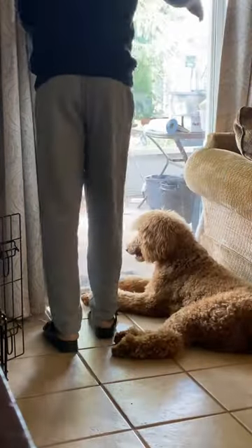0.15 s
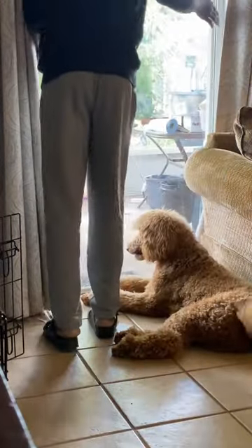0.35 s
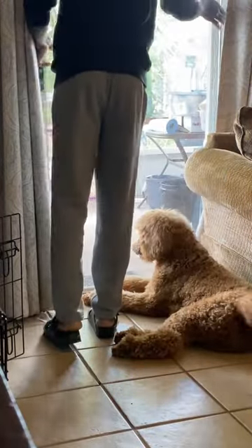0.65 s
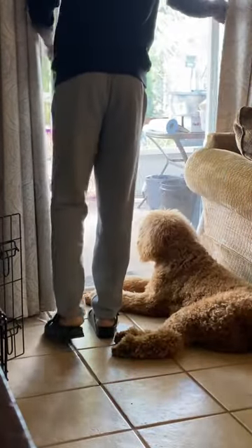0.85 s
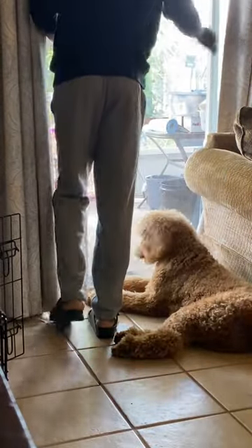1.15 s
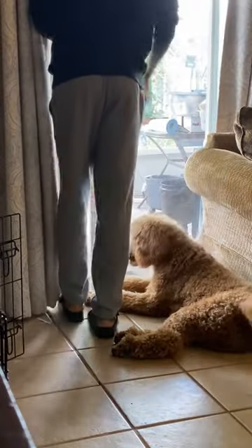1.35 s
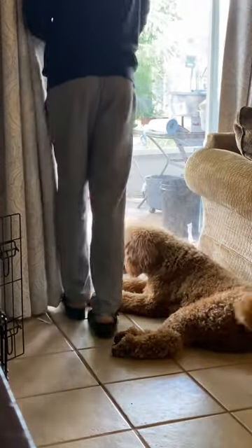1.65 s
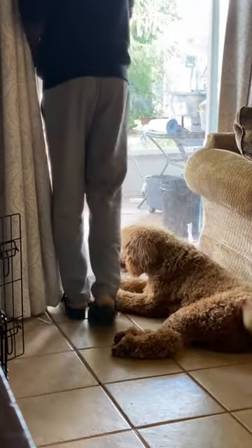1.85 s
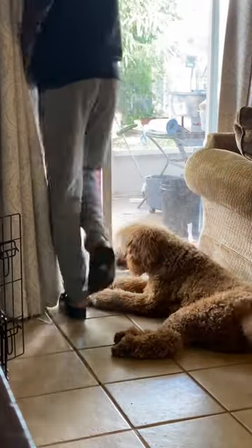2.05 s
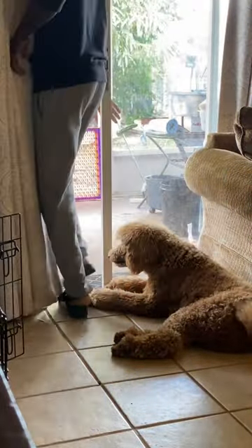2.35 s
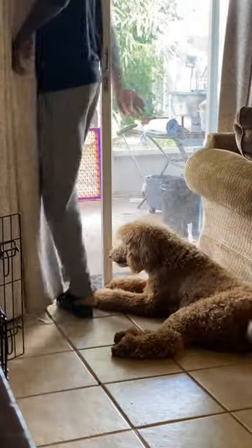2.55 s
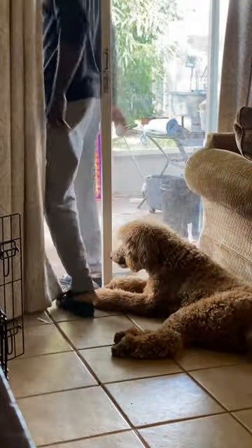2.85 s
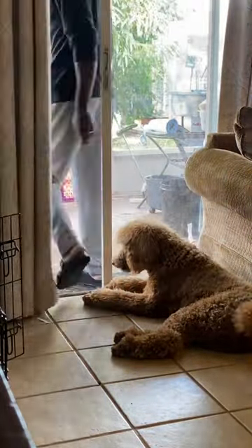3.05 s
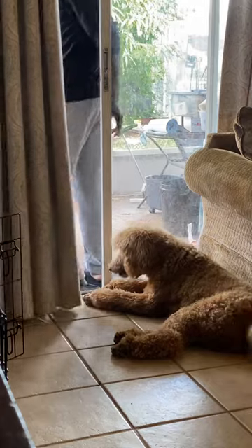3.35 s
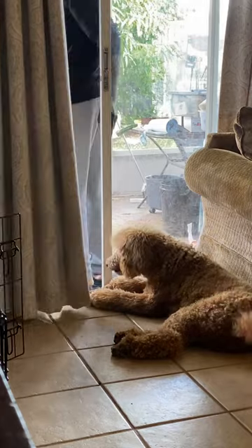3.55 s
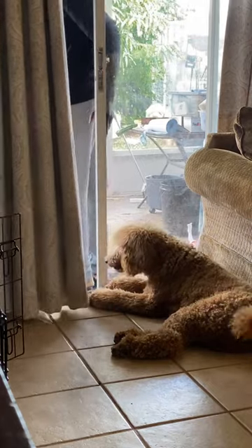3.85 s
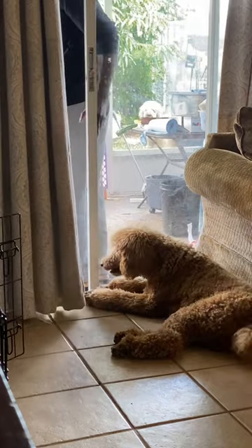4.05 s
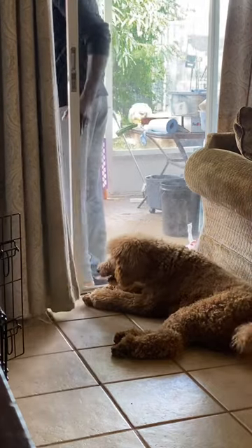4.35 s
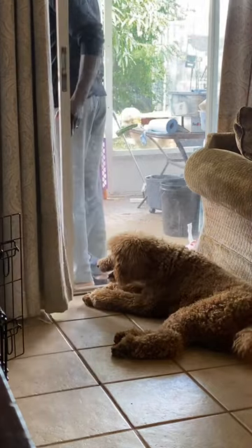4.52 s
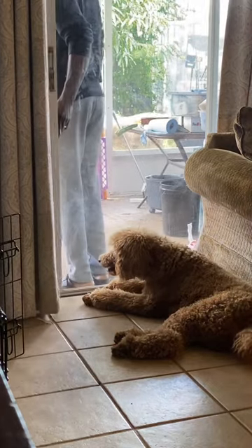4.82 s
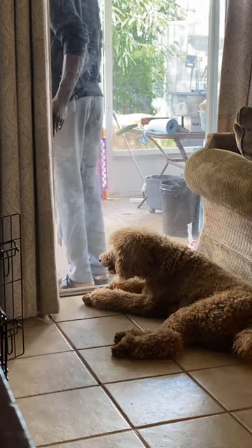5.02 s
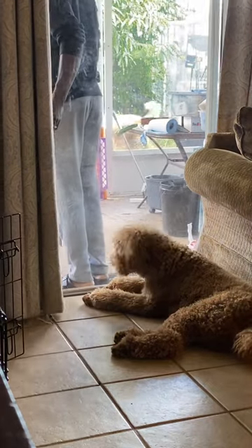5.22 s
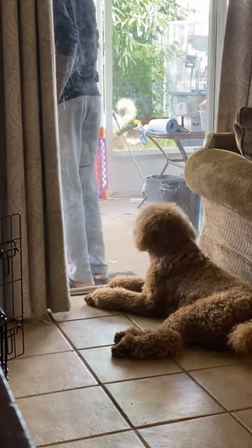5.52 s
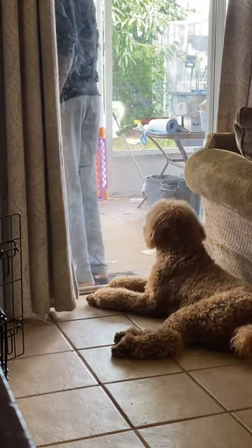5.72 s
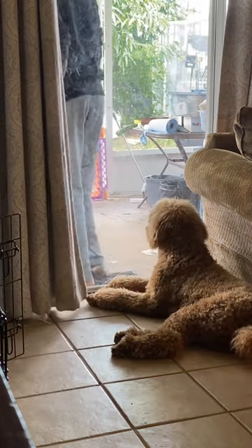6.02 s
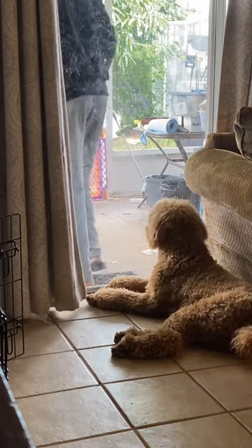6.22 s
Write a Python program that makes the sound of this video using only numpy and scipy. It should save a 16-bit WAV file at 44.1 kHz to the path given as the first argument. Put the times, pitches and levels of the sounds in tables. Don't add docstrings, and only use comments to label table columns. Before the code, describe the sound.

A low, unsteady machine hum near 90 hertz and soft room air run underneath, heard close to a tiled floor with short, hard reflections. At 0 seconds a shoe taps and scuffs; curtain cloth swishes faintly. From 0.45 the glass door starts with small gritty ticks, then breaks free at 0.82 with a hard hollow knock, rebounding at 0.9 and 1.0 as pane and frame shudder and the rail scrapes, slowing until 1.55. Heavy shoe thuds, scuffs and thin squeaks cross the sill from 1.7 to 2.5. Cloth brushes, with another step at 3.2 and a lighter one at 3.5. From 3.6 the door rolls shut, duller, with repeated clacks and taps; the latch strikes sharply at 4.46. Small rattles and clacks settle until 5.4. Deep, soft footfalls come at 5.5 to 5.9, the hum surging briefly, then dropping away to near quiet by 6.3.

```python
import sys
import numpy as np
from scipy import signal
from scipy.fft import rfft, irfft, next_fast_len
from scipy.io import wavfile

SR = 44100
rng = np.random.default_rng(int(sys.argv[2]) if len(sys.argv) > 2 else 0)


def voltage_ratio(decibels):
    exponent = np.asarray(decibels, float) / 20
    return 10 ** exponent


def store_wav(level_fs):
    pcm = np.round(np.clip(np.atleast_2d(level_fs), -1, 1) * 32767)
    wavfile.write(sys.argv[1], SR, pcm.T.astype(np.int16))


N = 281269


def rms_one(x):
    return x / np.sqrt(np.mean(x ** 2) + 1e-20)


def in_time(rows):
    s, *columns = np.transpose(rows)
    return [np.interp(np.arange(N) / SR, s, c) for c in columns]


def at_hz(points, hz):
    f, db = np.transpose(points)
    return np.interp(np.log(hz + 1), np.log(f), db)


def drift(rate):
    r = np.exp(-80 * np.pi * rate / SR)
    noise = rng.standard_normal(N // 40 + 2002)
    slow = signal.lfilter([1], [1, -2 * r, r * r], noise)[2000:]
    return np.interp(np.arange(N) / 40, np.arange(len(slow)), rms_one(slow))


def colour(x, spectrum):
    hz = np.fft.rfftfreq(N, 1 / SR)
    low, high = spectrum[0][0], spectrum[-1][0]
    skirt = 1 / np.sqrt((1 + (low / (hz + 1)) ** 8) * (1 + (hz / high) ** 8))
    return rms_one(irfft(rfft(x) * voltage_ratio(at_hz(spectrum, hz)) * skirt, N))


def resonate(x, modes):
    out = 0
    for k, (hz, width, db) in enumerate(modes):
        r = np.exp(-np.pi * max(width, 2) / SR)
        a = [1, -2 * r * np.cos(2 * np.pi * hz / SR), r * r]
        b = np.array([1, 0, -1]) * (1 - r * r) / 2
        out = out + (-1) ** k * voltage_ratio(db) * signal.lfilter(b, a, x)
    return out


def patchy(x, modes):
    return sum(voltage_ratio(3.5 * drift(9)) * resonate(x, [mode]) for mode in modes)


def dull(x, hz):
    return signal.sosfilt(signal.butter(4, hz, fs=SR, output="sos"), x)


def grit(per_s, spread_db):
    sizes = voltage_ratio(spread_db * np.minimum(rng.exponential(1, N), 4)) * rng.choice([-1, 1], N)
    return rms_one(sizes * (rng.random(N) < per_s / SR))


def bursts(times, levels_db, t60s, rises, bend=1):
    out = np.zeros(N)
    t = np.arange(SR // 2) / SR
    for s, db, t60, rise, curve in zip(times, levels_db, t60s, rises, bend + 0 * times):
        i = round(s * SR)
        attack = 1 - np.exp(-t / max(rise, 1e-4))
        shape = attack * voltage_ratio(db - 60 * (t / max(t60, .01)) ** curve)
        out[i:i + len(t)] += shape[:N - i]
    return out


def blows(times, levels_db, modes):
    strike = np.zeros(N) + 1e-18
    strike[np.round(times * SR).astype(int)] = voltage_ratio(levels_db)
    unit = resonate(signal.unit_impulse(2000), modes)
    return resonate(strike, modes) / np.max(np.abs(unit))


def swells(rows):
    t = np.arange(N) / SR
    return sum(voltage_ratio(db) * np.sin(np.pi * np.clip((t - s) / length, 0, 1)) ** .5 for s, length, db in rows)


def joined(*levels_db):
    return 10 * np.log10(sum(voltage_ratio(2 * db) for db in levels_db))


# (t/s, level/dB)
OPENING = [(0.451, -90.5), (.64, -74), (.73, -67.5), (0.831, -67), (.92, -59.5), (1.1, -68), (1.299, -75.5),
           (1.468, -71.5), (1.571, -90)]
# (t/s, level/dB)
CLOSING = [(3.62, -100), (3.819, -80), (4.05, -75.5), (4.16, -70), (4.3, -73.5), (4.49, -71.5), (4.56, -67),
           (4.65, -73), (4.72, -87.5)]


def rolled(rule):
    t = np.arange(N) / SR
    levels = []
    for stroke, db in zip((OPENING, CLOSING), rule):
        effort_db = np.interp(t, *np.transpose(stroke), left=-200, right=-200)
        levels.append(db + rule[2] * (effort_db + 70))
    return levels


# (t/s, level/dB)
AIR = [(0, -57.5), (.35, -69), (.6, -57.5), (1.7, -52.5), (1.9, -49.5), (2.27, -55.5), (2.5, -61.5),
       (2.72, -58.5), (2.91, -55), (3.18, -55), (3.5, -51.5), (4.8, -56), (5.17, -60.5), (5.5, -53.5),
       (5.7, -60.5), (5.9, -71.5), (6.13, -95.5), (6.38, -69)]


def stirred(rule):
    return rule[0] + rule[1] * (in_time(AIR)[0] + 57)


# (start/s, length/s, cloth level/dB, rail level/dB)
SWISHES = [
    (0.09, 0.89, -68, -86.5),
    (2.68, 0.42, -72.5, -91),
    (4.598, 0.99, -73, -85),
]


def swished(column):
    t = np.arange(N) / SR
    levels = []
    for row in SWISHES:
        swell = np.sin(np.pi * np.clip((t - row[0]) / row[1], 0, 1)) ** .5
        levels.append(row[column] + 20 * np.log10(swell + 1e-6))
    return levels


# (t/s, peak level/dB, t60/s, boom level/dB, slap level/dB)
STEPS = [(.02, -42.5, 0.38, -13, -9), (0.257, -49.5, 0.82, -2, -39), (0.409, -43.5, 0.63, 4, -45),
         (1.684, -38, 0.4, 8, -44), (1.747, -29, 0.34, -10, -19.5), (1.858, -48.5, 0.28, -0.5, -11.5),
         (2.055, -36, 0.76, -13, -30.5), (2.076, -38, 0.24, 10, 1), (2.163, -37, 0.22, -7, -22),
         (2.326, -34.5, 0.58, -10, -30), (2.447, -59.5, 0.15, 11, -18.5), (2.498, -37.5, 0.54, -37, -22.5),
         (3.222, -31.5, 0.39, -9, -23.5), (3.476, -36.5, 0.14, -7, -20), (5.503, -38.5, 0.49, 9.5, -14.5),
         (5.534, -46.5, 0.26, 12, -11.5), (5.661, -48, 0.34, -2.5, -15.5), (5.907, -54.5, 0.15, 9, -19),
         (5.776, -40.5, 0.24, 15, -15.5)]
# (t/s, peak level/dB, t60/s, boom level/dB)
JOLTS = [(0.696, -30, 0.33, -6), (0.848, -29.5, 0.13, -0.5), (1.003, -30, 0.29, -26),
         (3.607, -30.5, 0.37, -29), (3.758, -43, 0.11, -1), (3.984, -36, 0.34, -28),
         (4.172, -40, 0.93, -33.5), (4.425, -41.5, 0.19, -17), (4.625, -44.5, 0.5, 14.5),
         (1.1, -40.5, 0.79, -6.5), (5.038, -51, 0.13, 23.5), (5.2, -51, 0.52, 7)]
JOLT_SLAP_DB = -18.5


def thuds():
    return np.transpose(STEPS + [row + (JOLT_SLAP_DB,) for row in JOLTS])


# (f/Hz, level/dB per Hz)
ROOM_AIR = [(65, -29.5), (110, -13), (209, -6), (330, -9), (376, -8.5), (515, -25), (607, -23), (1800, -60),
            (2340, -87), (3960, -120)]
# (f/Hz, width/Hz, level/dB)
APPLIANCES = [(260.5, 1.9, -76), (389.1, 4.7, -69.5)]
# (f/Hz, level/dB per Hz)
HISS = [(1500, -14), (5000, -15), (9500, 3.5), (12400, -12.5)]


def room_floor():
    air, whine, hiss = rng.standard_normal((3, N))
    tones = sum(voltage_ratio(db) * rms_one(resonate(whine, [(hz, width, 0)])) for hz, width, db in APPLIANCES)
    return voltage_ratio(-67.5) * colour(air, ROOM_AIR) + tones + voltage_ratio(-102) * colour(hiss, HISS)


# (t/s, level/dB)
HUM = [(0.0, -43), (0.1, -45.5), (2.15, -36), (2.18, -52), (2.26, -41.5), (2.91, -49.5), (3.29, -39.5),
       (3.32, -50.5), (3.43, -38.5), (4.1, -38.5), (4.14, -43.5), (5.26, -45.5), (5.45, -59), (5.52, -32.5),
       (5.63, -54), (5.68, -34.5), (6.15, -68.5), (6.38, -88)]
# (t/s, f/Hz)
HUM_PITCH = [(0.0, 92.3), (2.21, 89.85), (2.42, 84.7), (2.5, 89.2), (2.61, 84.3), (2.73, 92.5),
             (3.85, 90.8), (4.42, 93.06), (5.2, 91.7), (5.32, 89), (5.42, 85.65), (5.73, 84.75),
             (5.82, 83.3), (6.2, 80)]
# (f/Hz, level/dB per Hz)
RUMBLE = [(16, -25), (40, -16), (60, 0.5), (73, -5), (103, -2), (118, -10.5), (130, -16.5), (170, -39.5),
          (290, -120)]
HUM_WANDER_HZ = 1.155
DRONE_DB, DRONE_FOLLOWS = -52.5, 0.5
RUMBLE_DB, RUMBLE_FOLLOWS = -57, 0.089
DRONE_ROLL, RUMBLE_ROLL = (-43, -41.5, 0.91), (-53.5, -62.5, 0.61)
THUD_TONE_DB, THUD_DRONE_DB, THUD_RUMBLE_DB = -13, -14, -13.5


def outdoor_machine():
    tone_db, = in_time(HUM)
    s, db, t60, _, _ = thuds()
    stir = bursts(s, db, 1.4 * t60, s * 0 + 0.13)
    drone_db = joined(DRONE_DB + DRONE_FOLLOWS * (tone_db + 48.5), *rolled(DRONE_ROLL))
    drone_db = drone_db + 0.53 * drift(15)
    air_db = joined(RUMBLE_DB + RUMBLE_FOLLOWS * (tone_db + 35.5), *rolled(RUMBLE_ROLL))
    air_db = air_db + 0.23 * drift(15)
    phase = 2 * np.pi * np.cumsum(in_time(HUM_PITCH)[0] + HUM_WANDER_HZ * drift(5.47)) / SR
    tone_gain = voltage_ratio(tone_db - 3 + 1.1 * drift(2.6)) + voltage_ratio(THUD_TONE_DB) * stir
    tone = np.sqrt(2) * np.sin(phase) * tone_gain
    drone_modes = [(155.8, 8.1, 1), (123, 54, -6.5), (199, 56, -13)]
    drone = dull(rms_one(resonate(rng.standard_normal(N), drone_modes)), 260)
    drone = (voltage_ratio(drone_db - 6) + voltage_ratio(THUD_DRONE_DB) * stir) * drone
    air_gain = voltage_ratio(air_db + 5.5) + voltage_ratio(THUD_RUMBLE_DB) * stir
    return tone + drone + air_gain * colour(rng.standard_normal(N), RUMBLE)


# (f/Hz, level/dB per Hz)
DUST = [(5500, -3), (8000, -1.5), (10500, 0), (12500, -3.5), (14500, -12)]
# (start/s, length/s, level/dB)
SINGS = [
    (.52, .2, -85),
    (1.04, 0.61, -82.5),
    (3.74, .3, -86),
    (4.2, 0.19, -87.5),
]
# (f/Hz, width/Hz, level/dB)
RAIL_SONG = [(3700, 220, 0), (3100, 330, -8.5)]
DUST_AIR, DUST_ROLL = (-102, .4), (-96, -92.5, .3)


def dust():
    dust_db = joined(stirred(DUST_AIR), *rolled(DUST_ROLL)) + 1.5 * drift(15)
    fine = voltage_ratio(dust_db) * colour(grit(6000, 2.5), DUST)
    song = rms_one(resonate(grit(1200, 2.1), RAIL_SONG))
    return fine + swells(SINGS) * voltage_ratio(2.5 * drift(30)) * song


# (start/s, length/s, level/dB,
# f/Hz)
HOLLOWS = [(0.22, 0.26, -73.5, 1040), (1.25, .25, -59, 620), (2.54, 0.51, -74.5, 1020),
           (2.928, 0.35, -65, 630), (4.4, 0.091, -57.5, 810), (3.4, 0.086, -58.5, 820),
           (5.278, 0.047, -74, 1160), (.98, .3, -53, 555), (4.2, 0.26, -56.5, 555), (1.9, .09, -46.5, 260),
           (2.065, .08, -47.5, 250), (.45, 0.1, -55, 404), (5.08, 0.11, -66.5, 500)]


def hollows():
    rub = grit(1500, 2)
    out = 0
    for start, length, db, hz in HOLLOWS:
        note = resonate(resonate(rub, [(hz, 70, 0)]), [(hz, 200, 0)])
        out = out + swells([(start, length, db)]) * rms_one(note)
    return out


# (t/s, peak level/dB, f/Hz)
TAPS = [(0.018, -55.5, 520), (0.502, -55.5, 527), (0.543, -59, 480), (0.629, -55, 482), (0.677, -56, 684),
        (0.715, -57, 674), (0.795, -46, 475), (0.822, -41.5, 635), (0.879, -44, 660), (0.997, -33, 448),
        (1.081, -34, 553), (1.218, -41.5, 503), (1.311, -49.5, 630), (1.369, -44.5, 523), (1.429, -45, 541),
        (1.674, -49.5, 626), (1.753, -45.5, 643), (1.78, -48.5, 490), (1.888, -64, 608), (2.061, -44, 514),
        (2.084, -51.5, 482), (2.179, -46, 475), (2.323, -44, 705), (2.352, -42, 488), (2.498, -51, 498),
        (2.529, -50, 520), (2.785, -50.5, 558), (3.223, -39, 493.5), (3.535, -60, 486), (3.606, -40, 680),
        (3.755, -44.5, 534), (3.822, -52.5, 548), (3.847, -42, 477), (3.922, -45.5, 638), (3.986, -40, 601),
        (4.05, -41.5, 463), (4.116, -42.5, 533), (4.16, -43.5, 494), (4.296, -38.5, 491.5),
        (4.398, -45, 505), (4.459, -39.5, 490), (4.549, -44.5, 570), (4.7, -46.5, 559), (4.789, -53.5, 775),
        (4.928, -55.5, 742.6), (5.201, -59.5, 635), (5.225, -47.5, 536), (5.511, -53, 638),
        (5.531, -52, 536), (5.61, -57.5, 598)]
# (f/Hz, width/Hz, level/dB)
TAP_MODES = [(440, 160, -1.5), (645, 71, -3), (716, 88, -2), (820, 120, -10)]
# (t/s, peak level/dB)
HEELS = [(.262, -44.5), (0.328, -50), (1.802, -31), (2.129, -40), (0.417, -28), (1.692, -27.5),
         (1.748, -38), (1.781, -33), (2.078, -27), (2.108, -33), (2.343, -36), (3.262, -46), (5.533, -27),
         (5.572, -32.5), (5.678, -38.5), (5.803, -31), (5.903, -37.5)]
# (f/Hz, width/Hz, level/dB)
HEEL_MODES = [(101, 37, 3.5), (160, 68, 0), (264.3, 45, -0.5)]
TAP_LEAD_S = .0025
TAP_DB, TAP_TAIL_DB, TAP_T60_S = -5, -9.5, 0.14
TAP_RING_DB, TAP_RING_T60_S = -2.5, 0.11


def taps_and_heels():
    s, db, hz = np.transpose(TAPS) - [[TAP_LEAD_S], [0], [0]]
    own_db = rng.normal(0, 3, (len(s), len(TAP_MODES)))
    rings = 0
    for k, mode in enumerate(TAP_MODES):
        rings = rings + blows(s, db + TAP_DB + mode[2] + own_db[:, k] - 10, [mode])
    t = np.arange(SR // 5) / SR
    for start, level_db, pitch_hz in zip(s, db, hz):
        i = round(start * SR)
        fall = voltage_ratio(level_db + TAP_RING_DB - 60 * t / TAP_RING_T60_S)
        rings[i:i + len(t)] += fall * np.sin(2 * np.pi * pitch_hz * t)
    shiver = rms_one(resonate(grit(2000, 2), TAP_MODES))
    shiver = shiver * bursts(s, db + TAP_TAIL_DB, s * 0 + TAP_T60_S, s * 0 + 0.0012)
    at, heel_db = np.transpose(HEELS)
    return dull(rings + shiver, 1100) + dull(blows(at, heel_db, HEEL_MODES), 380)


# (t/s, peak level/dB, brightness/dB)
GRIT = [(0.455, -59.5, -7.5), (0.496, -62, -9), (0.538, -50, -13), (.6005, -55.5, -14), (.6725, -49, -20),
        (.69, -56, -18), (0.727, -48.5, -17), (.772, -66, -6), (1.16, -73, -9), (1.196, -70, -16),
        (0.8223, -35.5, -10), (0.999, -44, -5), (1.011, -67, -5), (1.3109, -59, -9), (1.372, -46.5, -17),
        (1.8817, -68.5, -10), (2.96, -68, -8), (3.603, -50.5, -20), (3.652, -53.5, -18), (3.7493, -53, -19),
        (3.8396, -50.5, -23), (3.9853, -46.5, -21), (3.808, -67, -17), (4.044, -54, -25), (4.092, -50, -19),
        (4.1558, -41, -17.5), (4.2113, -53, -18), (4.267, -53, -21), (4.429, -60, -8), (4.457, -41, -15),
        (4.466, -39, -11), (4.5456, -58, -36), (4.618, -47.5, -19), (4.7, -56.5, -21), (4.8998, -67, -13),
        (5.2, -66, -14), (5.29, -66, -16), (5.363, -71, -17), (5.014, -68, -10), (5.0346, -55.5, -15)]
# (t/s, peak level/dB, brightness/dB, length/s)
SCUFFS = [(0.009, -50, -13.5, 0.1), (0.107, -88.5, 13.5, 0.078), (1.677, -54, -11, 0.092),
          (1.721, -58.5, -14, 0.13), (1.857, -64, -11.5, 0.093), (1.883, -77, -3, .07),
          (2.009, -71, -15, 0.11), (2.0575, -58.5, -16, 0.16), (2.187, -58, -13.5, 0.056),
          (2.322, -77.5, -5, 0.42), (2.804, -71, -9.5, 0.18), (2.944, -64.5, -11.5, 0.08),
          (3.223, -63, -20, 0.082), (3.362, -83, 1, 0.045), (3.474, -62, -16, 0.048),
          (5.5, -56.5, -16.5, 0.13), (5.655, -73.5, -15, 0.073)]
# (t/s, peak level/dB, brightness/dB, length/s)
DRAGS = [(0.725, -60, -4, 0.13), (0.832, -56, -5, 0.2), (1.004, -58.5, -9, 0.21), (4.47, -66, -1, 0.12),
         (4.525, -71.5, -19, 0.39), (4.91, -76, -11, 0.079), (5.05, -65, -24, 0.085),
         (5.222, -77.5, -9, 0.088), (4.15, -68, -18, 0.44)]
# (t/s, peak level/dB, t60/s, top level/dB)
SQUEAKS = [
    (0.0213, -72, 0.034, -1.5),
    (1.5663, -78.5, 0.014, 6),
    (1.5826, -81, 0.02, 5.5),
    (1.6806, -73.5, 0.033, -4.5),
    (1.6944, -78, 0.041, -7.5),
    (2.0723, -75.5, 0.014, -18),
    (2.0996, -75.5, 0.026, -9),
    (2.1902, -81, 0.024, -21.5),
    (5.5038, -80, 0.022, -15.5),
]
# (f/Hz, level/dB per Hz)
SCRAPE = [(880, -26.5), (1500, -0.5), (1700, -9.5), (2490, -9.5), (2840, -8), (4600, -24.5), (5980, -57.5),
          (10100, -120)]
# (f/Hz, level/dB per Hz)
SHEEN = [(2710, -29.5), (4600, -8), (6650, -9), (9650, -18.5), (10500, -21), (12100, -26.5), (12700, -59),
         (22000, -120)]
# (f/Hz, width/Hz, level/dB)
RAIL = [(2020, 1100, 3), (3160, 550, -7), (3780, 880, 0), (4360, 140, 6)]
# (f/Hz, width/Hz, level/dB)
RAIL_TOP = [(5790, 910, 11), (6450, 500, 1.5), (7300, 340, -3.5)]
GRIT_T60_S, TICK_RISE_S, TICK_FRONT_DB = .1, .002, -12
SCUFF_HOLD = 3


def rail(roll_db, sheen_db):
    ticks = [row + (GRIT_T60_S, 1) for row in GRIT]
    rubs = [row + (SCUFF_HOLD,) for row in SCUFFS + DRAGS]
    s, db, bright_db, t60, bend = np.transpose(ticks + rubs)
    grains, fine = grit(3000, 1.2), grit(4600, 3.1)
    scrape = colour(grains + 1.9 * patchy(grains, RAIL) + 1.1 * resonate(grains, RAIL[2:3]), SCRAPE)
    sheen = colour(fine + 0.16 * patchy(fine, RAIL_TOP), SHEEN)
    lumps = drift(29)
    rolling = voltage_ratio(roll_db + 0.56 * lumps + 0.4 * drift(4.6))
    scrape = scrape * (rolling + bursts(s, db - 14.5, t60, s * 0 + TICK_RISE_S, bend=bend))
    at, tick_db, _ = np.transpose(GRIT)
    scrape = scrape + dull(blows(at + .001, tick_db + TICK_FRONT_DB, RAIL[:3]), 4500)
    soft = rms_one(dull(resonate(sheen, RAIL_TOP[:1]), 7200))
    glide = soft + voltage_ratio(0.63 * (sheen_db + 74)) * sheen
    glide = glide * voltage_ratio(sheen_db + 9.5 + 0.62 * lumps)
    sheen = glide + sheen * bursts(s, db + bright_db - 8.5, 0.9 * t60, s * 0 + 0.00067, bend=bend)
    s, db, t60, top_db = np.transpose(SQUEAKS)
    thin = rms_one(resonate(fine, [(10600, 630, 7.3), (13400, 710, 4.4)]))
    top = rms_one(resonate(fine, [(15300, 1000, 0)]))
    squeaks = bursts(s, db + 8.5, t60, s * 0 + 0.00019) * thin
    return scrape + sheen + squeaks + bursts(s, db + top_db, t60, s * 0 + 0.0002) * top


# (t/s, peak level/dB, t60/s)
KNOCKS = [
    (0.543, -55.5, 0.94),
    (.8164, -34.5, 0.36),
    (0.8251, -28, 0.16),
    (0.8883, -30.5, 0.59),
    (0.9416, -41, 0.065),
    (1.0035, -32, 0.25),
    (1.048, -43, 0.12),
    (4.465, -25.5, 0.22),
    (5.512, -54, 0.19),
]
# (t/s, peak level/dB)
CLACKS = [(3.7505, -49), (3.818, -65), (3.844, -42.5), (3.923, -74), (3.987, -43), (4.044, -47),
          (4.1, -44.5), (4.162, -38), (4.2116, -44), (4.5537, -43.5), (4.6247, -46.5), (4.7018, -43.5),
          (4.789, -47.5), (4.9011, -46), (5.0396, -46), (5.202, -50.5), (5.2938, -53), (5.371, -55.5)]
# (t/s, peak level/dB)
SILL = [(0.018, -58.5), (1.679, -60.5), (1.752, -62.5), (2.061, -70.5), (2.321, -61), (2.4944, -66.5),
        (2.738, -67), (2.7854, -90), (3.2205, -62), (3.476, -66), (3.603, -62), (5.508, -57), (5.59, -77),
        (5.69, -74.5), (5.775, -73)]
# (start/s, length/s, level/dB)
BUZZES = [
    (3.84, 0.4, -76.5),
    (4.5, 0.25, -63),
    (4.75, .75, -81.5),
]
# (f/Hz, width/Hz, level/dB)
FRAME = [(1184, 60, -5), (1252, 30, 2), (1312, 34, 1), (1420, 100, -13), (1195, 260, -11)]
# (f/Hz, level/dB per Hz)
FRAME_SPREAD = [(480, -23.5), (820, -2), (971, -3), (1070, -4.5), (1310, -5.5), (1550, -15.5), (2200, -35),
                (2860, -63.5), (4840, -120)]
LATCH_TOUCH = (4.4595, -30, 0.081)
CLACK_T60_S, SILL_T60_S = .13, .2


def hollow_frame(roll_db):
    s, db, t60 = np.transpose(KNOCKS + [LATCH_TOUCH] + [row + (CLACK_T60_S,) for row in CLACKS])
    wash = colour(grit(2600, 1), FRAME_SPREAD)
    rattle = grit(900, 2.2)
    loose = bursts(s, db - 13.5, 0.87 * t60, s * 0 + 0.0019) + voltage_ratio(roll_db - 15.5) + swells(BUZZES)
    rattling = resonate(loose * rattle, FRAME) / np.std(resonate(rattle, FRAME))
    low_rattle = rms_one(dull(resonate(rattle, [(656, 180, 0)]), 1200))
    crack = bursts(s, db - 27, t60 * 0.21, s * 0 + .001) * (wash + 0.8 * low_rattle)
    at, sill_db = np.transpose(SILL)
    crack = crack + bursts(at, sill_db, at * 0 + SILL_T60_S, at * 0 + 0.0016) * wash
    ring = resonate(blows(s, db - 2, FRAME), [(1400, 430, 0.0063)])
    return voltage_ratio(roll_db + 1.8 * drift(6.6)) * wash + dull(ring + rattling, 1500) + crack


# (f/Hz, width/Hz, level/dB)
PANE = [(228, 40, -2), (310.7, 11, -2), (396, 33.7, -3.5), (461.2, 19, 4), (533, 51, -7.5), (643.6, 43, -4),
        (743, 69, -20)]
# (f/Hz, level/dB per Hz)
PANE_SPREAD = [(100, -33.5), (170, -2.5), (216, -7), (301, 5.5), (352, -3), (1000, -31.5), (1300, -55.5),
               (2200, -120)]
THUD_RISE_S = 0.0063


def glass_pane(roll_db):
    s, db, t60, boom_db, slap_db = thuds()
    rise = s * 0 + THUD_RISE_S
    shake = grit(2500, 1.1)
    body = rms_one(rms_one(resonate(shake, PANE)) + 1.47 * colour(shake, PANE_SPREAD))
    deep = dull(body, 450)
    rolling = deep + voltage_ratio(np.minimum(.5 * (roll_db + 50.5), 0)) * (body - deep)
    boom = rms_one(resonate(rng.standard_normal(N), [(61, 8.4, 1), (98, 142.5, -4), (159.5, 99, -4)]))
    slap = rms_one(resonate(shake, [(590, 71, 3), (630, 310, -11.5)]))
    glass = voltage_ratio(roll_db + drift(45)) * rolling + bursts(s, db - 5.5, t60, rise, bend=0.84) * body
    hits = bursts(s, db + slap_db - 19, 1.1 * t60, 0.15 * rise) * slap
    hits = hits + blows(s, db + slap_db - 12, PANE[2:])
    floor = bursts(s, db + boom_db - 10, 1.9 * t60, 0.98 * rise) * boom
    floor = floor + blows(s + 0.0078, db - 10.5, [(112, 56, 0.00067)] + PANE[:2])
    return dull(glass, 850) + dull(hits, 1500) + dull(floor, 370)


PANE_AIR, FRAME_AIR, RAIL_AIR, SHEEN_AIR = (-57, 1), (-77, 1), (-92, 0.44), (-110, .15)
PANE_ROLL, FRAME_ROLL = (-46.5, -53, 0.6), (-62.5, -61, 0.84)
RAIL_ROLL, SHEEN_ROLL = (-70, -70, 1), (-88.5, -90, 0.94)


def scene():
    pane_db = joined(stirred(PANE_AIR), *rolled(PANE_ROLL))
    frame_db = joined(stirred(FRAME_AIR), *swished(2), *rolled(FRAME_ROLL))
    scrape_db = joined(stirred(RAIL_AIR), *swished(3), *rolled(RAIL_ROLL))
    sheen_db = joined(stirred(SHEEN_AIR), *rolled(SHEEN_ROLL))
    background = room_floor() + outdoor_machine() + dust() + hollows()
    door = rail(scrape_db, sheen_db) + hollow_frame(frame_db) + glass_pane(pane_db)
    direct = background + taps_and_heels() + door
    t = np.arange(6000) / SR
    echoes = rng.standard_normal((2, len(t))) * voltage_ratio(-60 * t / 0.022)
    echoes = echoes / np.linalg.norm(echoes[0])
    paths = signal.fftconvolve(direct[None], echoes, axes=1)[:, :N]
    turn = 3.26 * drift(3.18)
    return np.array([direct, np.cos(turn) * paths[0] + np.sin(turn) * paths[1]])


def roll_off(x):
    return signal.sosfilt(signal.butter(12, 15710, fs=SR, output="sos"), x)


# (f/Hz, level/dB)
SCATTER = [(100, -50), (300, -24), (500, -11), (750, -5), (1000, -3), (1250, -9), (1450, -5), (1700, -8),
           (2200, -15), (6000, -15), (9000, -12), (11500, -20)]
# (f/Hz, level/dB)
BALANCE_DB = [(60, .2), (380, .8), (700, 2), (1290, 4.5), (1800, .3), (15000, 0)]
# (f/Hz, phase/rad)
LEAD = [(20, 0), (200, -.25), (500, -.55), (1000, 0), (1720, .1), (2580, 1.1), (3530, .4), (4400, .9),
        (4750, 2.0), (4880, 3.14), (5020, 5.0), (5300, 6.3), (7000, 7.5), (10000, 8.6), (12000, 9.1),
        (16000, 8.6)]
FLOOR_DB = -112
CLOCK_HZ, CLOCK_DB = 12000, -67


def record(dry):
    size = next_fast_len(N + SR // 10)
    hz = np.fft.rfftfreq(size, 1 / SR)
    shared = rfft(dry[0], size)
    apart = voltage_ratio(at_hz(SCATTER, hz)) * rfft(dry[1], size)
    tilt = voltage_ratio(at_hz(BALANCE_DB, hz) / 2)
    left = (shared + apart) * tilt
    right = (shared - apart) / tilt * np.exp(-1j * at_hz(LEAD, hz))
    ports = irfft(np.array([left, right]), size)[:, :N]
    noise = voltage_ratio(FLOOR_DB) * rng.standard_normal((2, N))
    clock = voltage_ratio(CLOCK_DB) * np.sin(2 * np.pi * CLOCK_HZ * np.arange(N) / SR) * dry[0]
    return roll_off(ports + noise + clock)


dry = scene()
out = record(dry)
store_wav(out)
```